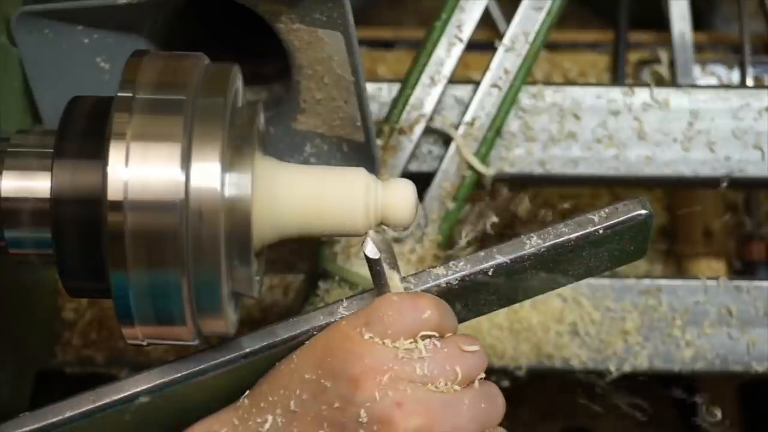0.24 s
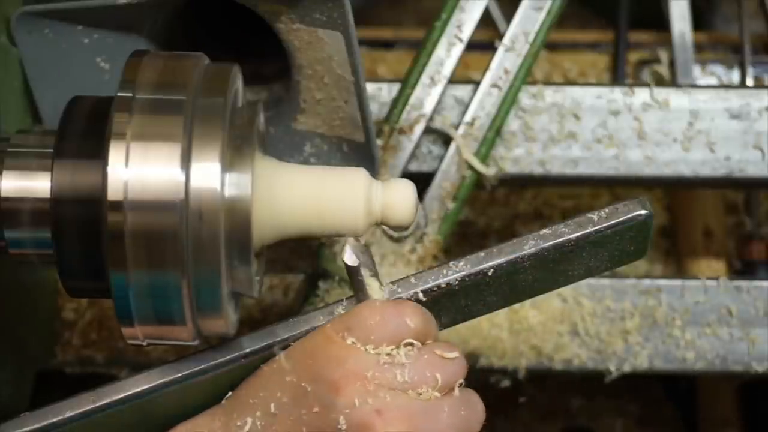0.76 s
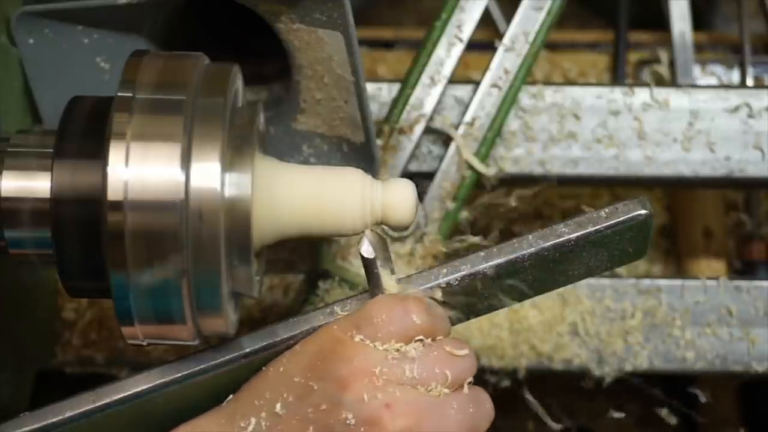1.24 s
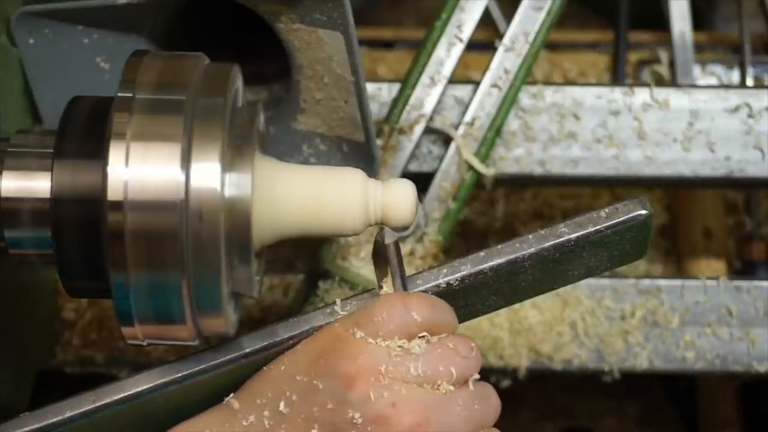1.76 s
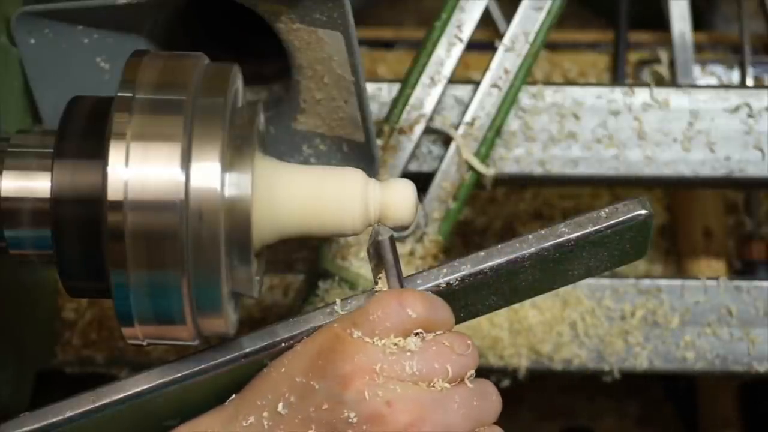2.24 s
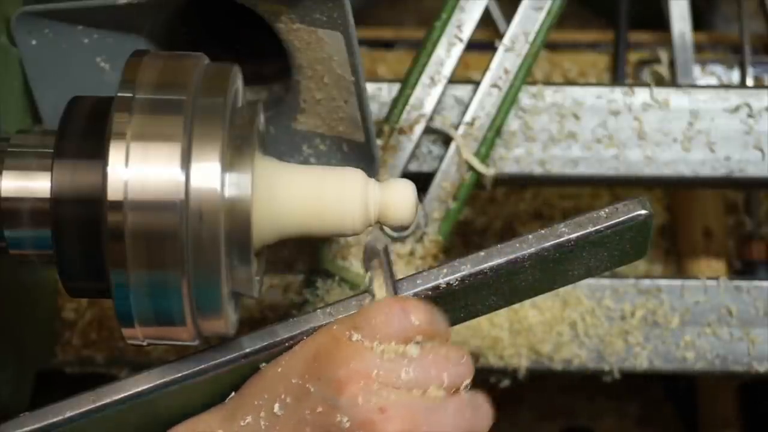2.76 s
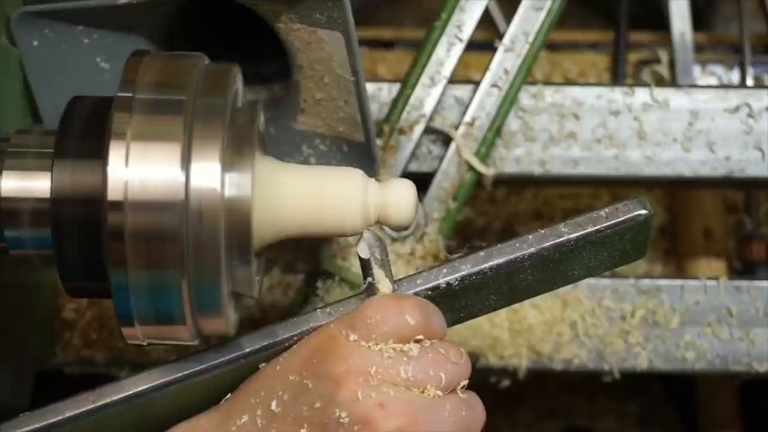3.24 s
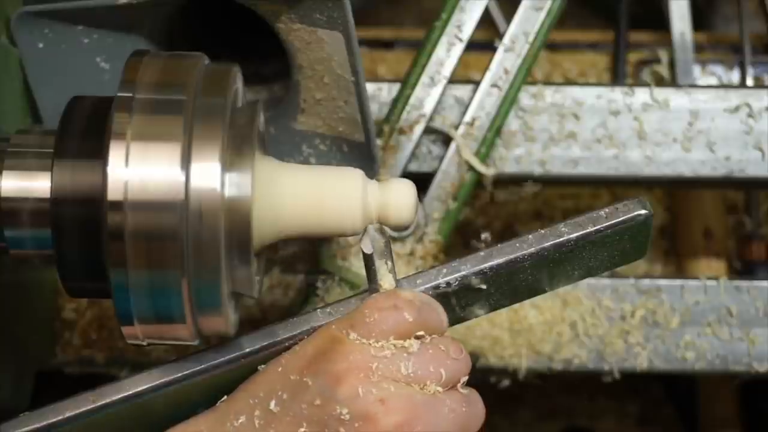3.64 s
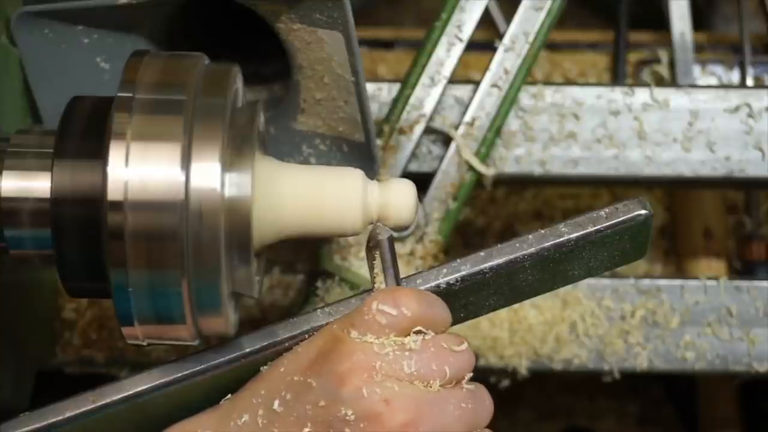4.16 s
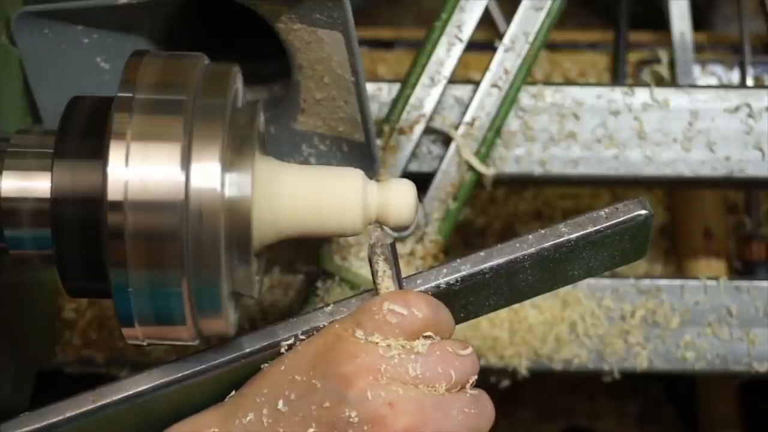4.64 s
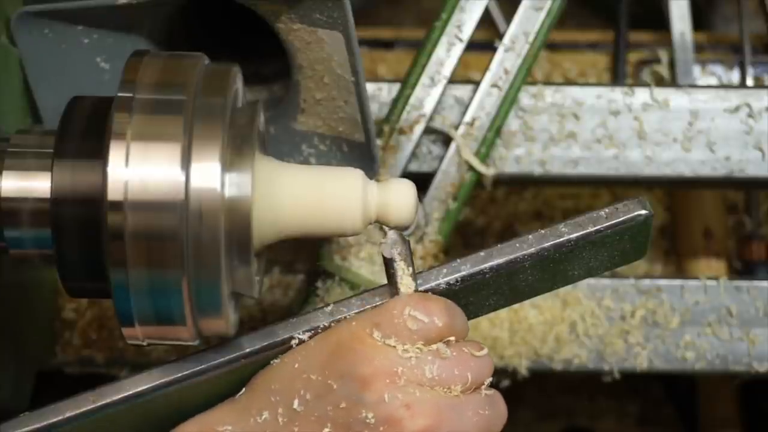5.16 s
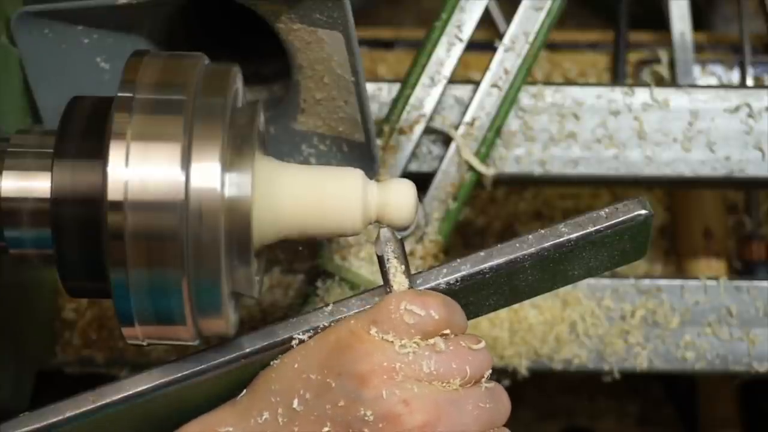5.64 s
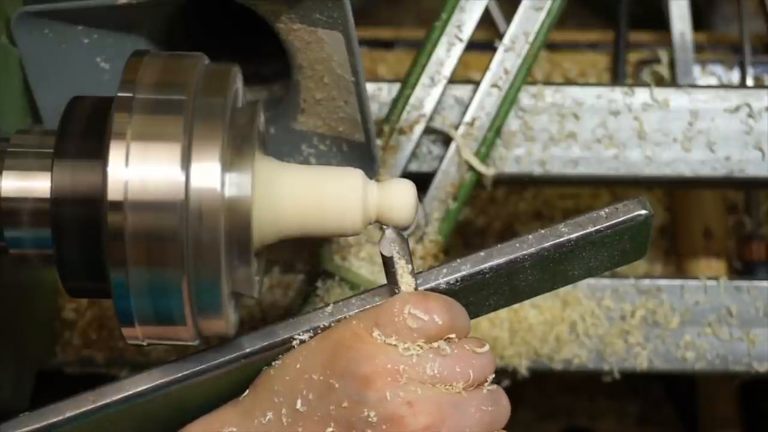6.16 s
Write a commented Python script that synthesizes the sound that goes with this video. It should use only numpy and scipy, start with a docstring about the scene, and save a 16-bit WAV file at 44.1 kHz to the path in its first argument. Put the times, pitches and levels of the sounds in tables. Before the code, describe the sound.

A lathe runs throughout, close up in a workshop, with rushing bearings and a wavering motor whine. Over it a chisel makes eight short scraping cuts on spinning wood, starting at once and again at about 0.7, 1.9, 3, 4.1, 4.9, 5.2 and 5.9 seconds. Each lasts under a second and has a bright ring of wood and steel. Light cuts buzz and throb; deeper ones hiss and tear off shavings, most strongly in the first second and a half. From half a second in, hard spots give small, sharp knocks against the edge. The tool rest groans softly near 1 and 3.5 seconds. Brief high squeals come near 2, 3, 4.2 and 5.4 seconds, and the blade chatters around 2 to 2.7 seconds and again near 4.4. The last cut carries on to about 6.4 seconds.

```python
"""Close up in a workshop, a lathe hums and whines while a chisel makes eight short cuts on a wooden spindle.
From the first, the scraping rings wood and steel. The same grain passes the edge every turn, so light cuts
buzz and throb; deep cuts tear up fresh wood and hiss. From half a second in, hard spots knock the edge.
Near 1 s the tool rest groans, near 2 s the tool squeals and the blade chatters; all three come back later.
Between cuts the bearings and motor run on."""
import sys
import numpy as np
from scipy import signal
from scipy.fft import rfft, irfft
from scipy.io import wavfile
from scipy.ndimage import uniform_filter1d, map_coordinates

SR = 44100
rng = np.random.default_rng(int(sys.argv[2]) if len(sys.argv) > 2 else 0)


def inscribe(sig):
    """Save sig as 16-bit PCM at rate SR to the path in sys.argv[1].

    A 1-D sig is mono; a 2-D sig holds one channel per row.
    Samples are clipped to [-1, 1] before scaling.
    """
    pcm = np.round(np.clip(np.atleast_2d(sig).T, -1, 1) * 32767)
    wavfile.write(sys.argv[1], SR, pcm.astype(np.int16))


N = 282636
TIME = np.arange(N) / SR
FREE_HZ = 42.42  # turns a second of the unloaded spindle

# The cuts: the bevel touches, then the edge bites, holds and lifts. Each row: bite time, lead of the touch,
# hold and release in seconds, touch and ring in relative dB, ring drift in dB/s, fizz in relative dB,
# fizz drift in dB/s, share (0-1) of the surface met again on the next turn.
CUTS = [(-0.03, 0.05, 0.62, 0.057, -40, -22, 6.5, -52.5, 3, 0.44),
        (0.724, 0.1, 0.79, 0.03, -34, -21, 3.5, -48.5, -12, 0.34),
        (1.898, 0.075, 0.71, 0.12, -27.5, -17, -3.5, -51, -1, 0.84),
        (2.999, 0.04, 0.7276, 0.057, -32, -24, 11, -52.5, 0, 0.65),
        (4.135, 0.069, 0.35, 0.09, -25, -19, 7, -50, -21, 0.66),
        (4.916, 0.098, 0.21, 0.12, -31.5, -23.5, -18, -36, -7, 0.42),
        (5.233, 0.013, 0.51, 0.2, -40, -20.5, -3.5, -39.5, -12.5, 0.48),
        (5.927, 0.051, 0.47, 0.092, -35.5, -22.5, 0.5, -42.5, 10.5, 0.71)]
# Resonances of chisel and tool rest. Each row: pitch in Hz, width in Hz, lift in dB.
STEEL = [(1170, 60, 5), (3190, 50, 6), (3620, 80, 2), (3850, 80, 3), (4830, 160, 4), (5420, 150, 6),
         (6130, 150, 6), (6980, 130, 3), (7720, 140, 6), (12600, 400, 4)]


def amp(db):
    """Decibels to gain."""
    return 10 ** (np.asarray(db) / 20)


def unit(x):
    """Scales to rms 1."""
    return x / np.sqrt(np.mean(x ** 2) + 1e-20)


def steady(x, size=2080):
    """Levels to rms 1 over size samples (about two turns by default), keeping the faster flutter."""
    power = uniform_filter1d(uniform_filter1d(x ** 2, size), size // 2)
    return x / np.sqrt(abs(power) + 1e-20)


def read(points, hz):
    """Reads a curve of points joined on a log-frequency axis."""
    f, value = np.transpose(points)
    return np.interp(np.log(hz + 1), np.log(f + 1), value)


def drift(rate_hz):
    """A smooth random wander of rms 1, with swings up to about rate_hz."""
    hz = np.fft.rfftfreq(N, 1 / SR)
    return unit(irfft(rfft(rng.standard_normal(N)) * np.exp(-(hz / rate_hz) ** 2), N))


def colour(x, spectrum, peaks=(), size=4096):
    """Minimum-phase EQ: a broad spectrum with resonances standing on it."""
    hz = np.fft.rfftfreq(size, 1 / SR)
    db = read(spectrum, hz) + sum(lift / (1 + (2 * (hz - f) / width) ** 2) for f, width, lift in peaks)
    cepstrum = irfft(np.log(amp(np.maximum(db, -100))))
    cepstrum[1:size // 2] *= 2
    cepstrum[size // 2 + 1:] = 0
    return signal.oaconvolve(x, irfft(np.exp(rfft(cepstrum))))[:N]


def resonate(x, hz, width_hz):
    """A steep resonance that may glide: shift hz down to zero, smooth twice, shift back."""
    carrier = np.exp(2j * np.pi * np.cumsum(hz * np.ones(len(x))) / SR)
    r = np.exp(-np.pi * width_hz / SR)
    return 2 * (carrier * signal.lfilter([(1 - r) ** 2], [1, -2 * r, r * r], x / carrier)).real


def envelope(start, rise, hold, release):
    """A smooth rise, a hold, and a fall of 40 dB in each release time."""
    age = TIME - start
    attack = np.sin(np.pi / 2 * np.clip(age / rise, 0, 1)) ** 2
    return attack * amp(-40 * np.maximum(age - rise - hold, 0) / release)


def swells(table):
    """Gain over time from rows of start, rise, hold, release and dB."""
    return sum(amp(db) * envelope(*shape) for *shape, db in table)


def blend(deep, light, depth):
    """Equal-power crossfade of two sounds by the depth of the cut."""
    return steady(np.sqrt(depth) * unit(deep) + np.sqrt(1 - depth) * unit(light))


def lathe(rush_db=-43.5, whine_db=-2, waver_hz=4.16, flutter=0.67):
    """Bearing noise rushes through the headstock, under the wavering whine of motor and belt."""
    # Colour of the bearing noise. Each row: frequency in Hz, relative level in dB.
    bearings = [(40, -34), (110, -51), (150, -15.5), (230, -11), (300, -2), (450, 1), (900, 4),
                (1300, -5.5), (1700, -7), (2400, -8.5), (3400, -6), (4500, -22.5), (7000, -29), (9200, -27),
                (10500, -45), (16000, -40)]
    # Headstock resonances. Each row: pitch in Hz, width in Hz, lift in dB.
    headstock = [(276, 9.2, 7.5), (455, 4.5, 7.5), (938, 22, 7.5), (1988, 450, 16), (3300, 69, -9.5),
                 (8260, 1100, 4.5)]
    # The rush comes up a little late on. Each row: time in seconds, lift in dB.
    rush_lift = [(4.6, -0.3), (5.1, 1.86)]
    # Tones of motor and belt. Each row: pitch in Hz, relative level in dB.
    tones = [(419.9, -58), (678.3, -62), (855.9, -58.5), (925.9, -59), (1184, -59.5), (1916, -51.5),
             (1960, -51), (2003, -48), (2229, -66), (2778, -64), (3176, -64), (3386, -70), (5803, -80),
             (8210, -72)]
    rush = unit(colour(rng.standard_normal(N), bearings, headstock))
    rush *= amp(rush_db + np.interp(TIME, *np.transpose(rush_lift)))
    whine = np.zeros(N)
    waver, swell = drift(25), drift(20)
    for hz, db in tones:
        shift = rng.integers(N)
        phase = 2 * np.pi * np.cumsum(hz + waver_hz * np.roll(waver, shift)) / SR
        whine += amp(db + whine_db) * np.sqrt(2) * np.sin(phase) * (1 + flutter * np.roll(swell, shift))
    return rush + whine


def strokes(bite_s=0.019, usual_db=-39, touch_fade_db_per_s=-75, touch_hiss_db=-35, touch_fizz_db=-12):
    """Gains of ring, shearing and fizz: each follows the bevel's touch, then the depth of the cut."""
    # Depth from bite to lift, one curve a cut. Each point: time in seconds, shearing in relative dB.
    depth_curves = [
        [(0.05, -32.5), (0.528, -37), (0.575, -45)],
        [(0.745, -42), (0.825, -34), (0.935, -33), (0.941, -31), (1.399, -37), (1.51, -55)],
        [(1.92, -42.5), (1.994, -46.5), (2.286, -39), (2.6, -38)],
        [(3.02, -45), (3.032, -54.5), (3.098, -41), (3.212, -44), (3.496, -37), (3.706, -40.5), (3.72, -50)],
        [(4.16, -38), (4.184, -38), (4.474, -45), (4.49, -49)],
        [(4.935, -68), (5.093, -49.5), (5.1, -69)],
        [(5.27, -42.5), (5.312, -42.5), (5.76, -53)],
        [(5.945, -51.5), (5.991, -54.5), (6.113, -44), (6.125, -54), (6.311, -40), (6.4, -42.5)],
    ]
    ring_follow, fizz_follow = 0.26, 0.65  # dB gained for each dB of depth
    ring, shear, fizz = np.zeros((3, N))
    for cut, curve in zip(CUTS, depth_curves):
        start, lead, hold, release, touch_db, ring_db, ring_drift, fizz_db, fizz_drift, _ = cut
        depth_db = np.interp(TIME, *np.transpose(curve))
        deeper_db = depth_db - usual_db
        age = np.clip(TIME - start, 0, hold)
        contact = envelope(start, bite_s, hold - bite_s, release)
        edge = envelope(start, bite_s, hold - bite_s, release * 0.82)  # hiss and fizz die before the ring
        fade_db = touch_fade_db_per_s * np.maximum(TIME - start + lead, 0)
        bevel = envelope(start - lead, rise=0.022, hold=lead, release=0.089) * amp(touch_db + fade_db)
        ring += bevel + contact * amp(ring_db + ring_follow * deeper_db + ring_drift * age)
        shear += bevel * amp(touch_hiss_db) + edge * amp(depth_db)
        fizz += bevel * amp(touch_fizz_db + fizz_db - ring_db)
        fizz += edge * amp(fizz_db + fizz_follow * deeper_db + fizz_drift * age)
    return ring, shear, fizz


def surface(turns, kept, size=1024):
    """The edge reads random relief round the wood; each turn cuts part away and bares new relief."""
    count = int(turns[-1]) + 2
    keep = np.clip(np.interp(np.arange(count), turns, kept * np.ones(N)), 0, .98)
    relief = rng.standard_normal((count, size))
    for k in range(1, count):
        relief[k] = keep[k] * relief[k - 1] + np.sqrt(1 - keep[k] ** 2) * relief[k]
    return map_coordinates(relief.ravel(), [turns * size], order=3, mode="nearest")


def bite(turns, depth, light_db=4.5, deep_db=1.5, runout=0.56, end_grain=0.1):
    """Grip of the edge: hard and soft patches, a high side, end grain twice a turn; steadier when deep."""
    patches = unit(surface(turns, 0.94, size=10) + 0.11 * surface(turns, 0.27, size=40))
    throb = runout * np.cos(2 * np.pi * turns) + end_grain * np.cos(4 * np.pi * turns)
    return amp((light_db + depth * (deep_db - light_db)) * (patches + throb))


def splinters(turns, spread_db=7.5, decay_s=0.0032):
    """Fibres snap at uneven sizes; each snap starts at once and dies within milliseconds."""
    sizes = amp(spread_db * surface(turns, 0.31, size=120))
    return unit(signal.lfilter([1], [1, -np.exp(-1 / (decay_s * SR))], sizes))


def roll(x, patchy_db):
    """The contact point wanders along the edge, so narrow bands swell and fade."""
    bands = signal.stft(x, nperseg=1024)[2]
    patches = rng.standard_normal(bands.shape)
    for _ in range(2):
        patches = uniform_filter1d(uniform_filter1d(patches, size=5, axis=0), size=18, axis=1)
    return signal.istft(bands * amp(patchy_db * unit(patches)), nperseg=1024)[1][:N]


def wood_ring(scrape, skim, depth):
    """Scraping rings the workpiece; a pressed-in edge lowers and widens the ring."""
    # The ring in a deep cut and in a light skim. Each row: frequency in Hz, relative level in dB.
    deep_colour = [(1000, -77), (1700, -51), (1780, -52), (1890, -19.5), (2220, -6), (2280, 4), (2400, 10),
                   (3000, -22), (3200, -17.5), (4160, -78), (7040, -120)]
    light_colour = [(300, -62), (1600, -43), (2100, -33), (2280, -16), (2370, -2.5), (2490, 1),
                    (2620, -10.5), (2850, -15), (3100, -44.5), (4200, -47.5)]
    return blend(colour(scrape, deep_colour), colour(skim, light_colour), depth)


def shear_hiss(scrape, skim, depth):
    """Shearing fibres hiss through the steel; a pressed-in edge darkens the hiss."""
    # The hiss in a deep cut and in a light skim. Each row: frequency in Hz, relative level in dB.
    deep_colour = [(100, -60), (1000, -32), (1800, -20), (2700, 4.5), (3300, -4), (3800, 2.5), (4300, -2.5),
                   (4600, -8.5), (5700, -11), (6300, -9), (7600, -11), (8200, -19.5), (8800, -27),
                   (12700, -27), (13500, -45), (15400, -42), (16000, -72)]
    light_colour = [(100, -66), (1800, 1), (2750, 16), (3300, -40), (3800, 6), (4450, -24), (5000, 3.5),
                    (5700, -7), (6300, 7.5), (6700, -28), (7500, 6.5), (8000, -55), (8800, -36),
                    (16000, -56)]
    deep = roll(colour(scrape, deep_colour, STEEL), patchy_db=2.5)
    light = roll(colour(skim, light_colour, STEEL), patchy_db=3.5)
    return blend(deep, light, depth)


def shavings(scrape, shear, thin_db=-10):
    """A thin shaving tears away all through a cut; now and then a thick one peels off."""
    # Thick shavings. Each row: start, rise, hold and release in seconds, relative level in dB.
    peels = [(-0.03, 0.08, 0.5, 0.091, -37.5), (0.36, 0.025, 0.035, 0.053, -44.5),
             (0.79, 0.024, 0.016, 0.055, -62), (0.9, 0.095, 0.2, 0.42, -35.5),
             (1.03, 0.013, 0.037, 0.096, -40), (1.29, 0.041, 0.033, 0.065, -45.5),
             (3.45, 0.072, 0.074, 0.27, -38), (4.18, 0.29, 0.018, 0.11, -42)]
    # Colour of tearing wood. Each row: frequency in Hz, relative level in dB.
    tear_colour = [(120, -73.5), (330, -11), (600, -46.5), (950, -14), (1170, 2.5), (1400, -6), (1600, 3.5),
                   (1780, 7), (1980, 14.5), (2200, 17), (2700, -1.5), (3500, 5), (9000, -44), (14000, -47)]
    return (swells(peels) + amp(thin_db) * shear) * steady(colour(scrape, tear_colour, STEEL))


def fibre_fizz(snapping, grip, turns, depth, throb_db=1.0):
    """Fine fibres fizz along the whole edge, which meets partly other patches of the wood."""
    # Colour of the fizz. Each row: frequency in Hz, relative level in dB.
    fizz_colour = [(300, -88), (6000, -45), (8700, -17), (9100, 3), (9450, 11), (9750, 6), (10300, 6),
                   (10900, 4.5), (11400, -10), (12600, -8), (13500, -18), (14300, -12), (15400, -19),
                   (16000, -43)]
    edge_grip = np.sqrt(grip * bite(turns, depth)) * amp(throb_db * np.cos(2 * np.pi * turns))
    return steady(roll(colour(edge_grip * snapping, fizz_colour), patchy_db=6.0))


def knocks():
    """Time and level of each knock: a hard spot meets the edge once a turn until it is cut away."""
    # Hard spots. Each row: first knock in seconds, relative peak in dB, number of turns.
    hard_spots = [(0.46, -5.5, 2), (0.672, -11, 1), (0.733, -18, 1), (0.909, -10, 1), (1.43, -8.5, 1),
                  (1.934, -11, 3), (2.054, -10, 2), (3.011, -14.5, 1), (3.256, -14, 2), (3.4, -8, 1),
                  (3.527, -5, 3), (4.251, -12, 1), (4.826, -20, 1), (4.921, -20, 1), (4.991, -17, 2),
                  (5.086, -15.5, 2), (5.242, -15, 1), (5.275, -11, 2), (5.395, -11, 1), (5.426, -11, 2),
                  (5.473, -9, 2), (6.088, -11, 1), (6.157, -19, 1), (6.242, -13, 1), (6.276, -8.5, 6)]
    return [(s + turn / FREE_HZ, db) for s, db, count in hard_spots for turn in range(round(count))]


def catches(ring_db=-6, ring_hz=2433.0, width_hz=101.0, hiss_db=-35, catch_s=0.011):
    """A hard spot knocks the edge: one short chirp of the workpiece, with a little hiss."""
    # Colour of that hiss. Each row: frequency in Hz, relative level in dB.
    hiss_colour = [(200, -75), (2000, -28), (3000, -37), (4500, -1), (7300, 5), (8500, -14), (12000, -17),
                   (14000, -49)]
    force = np.zeros(N)
    for s, db in knocks():
        # the force swells smoothly and lets go more slowly
        arc = np.interp((TIME - s) / catch_s, [-1 / 6, 1 / 3, 7 / 6], [0, np.pi / 2, np.pi])
        force += amp(db) * np.sin(arc) ** 2
    noise = rng.standard_normal(N)
    ring = steady(resonate(noise, ring_hz, width_hz), size=400)
    hiss = steady(colour(noise, hiss_colour, STEEL))
    return force * (amp(ring_db) * ring + amp(hiss_db) * hiss)


def riding(duck_db=-1.5):
    """A hard spot holds the edge off the softer wood for the turn around it."""
    held = np.zeros(N)
    for s, _ in knocks():
        held[abs(TIME - s) < .55 / FREE_HZ] = 1
    return amp(duck_db * uniform_filter1d(held, size=200))


def groan(scrape):
    """The tool rest groans under a heavy push."""
    # Pushes. Each row: start, rise, hold and release in seconds, level in dB.
    pushes = [(0.95, 0.15, 0.05, 0.3, -49.5), (3.5, 0.08, 0.11, 0.18, -49)]
    # Colour of the groan. Each row: frequency in Hz, relative level in dB.
    groan_colour = [(120, -56), (250, -19), (350, 6), (430, -4), (700, -25), (2000, -68)]
    return swells(pushes) * unit(colour(scrape, groan_colour))


def squeals(scrape, width_hz=110):
    """Stick and slip sings briefly as the tool rolls: gliding tones fed by the scraping."""
    # Squeals. Each row: start and end in seconds, first and last pitch in Hz, level in dB.
    glides = [(1.82, 2.007, 2740, 2930, -33), (2.984, 3.21, 2820, 2720, -36),
              (3.08, 3.129, 4970, 4530, -47), (3.03, 3.607, 3774, 3640, -39.5),
              (4.099, 4.394, 2800, 2700, -31.5), (5.282, 5.494, 3230, 3460, -43),
              (5.55, 5.753, 3380, 3565, -51)]
    out = np.zeros(N)
    for start, end, first_hz, last_hz, db in glides:
        span = slice(int(start * SR), int(end * SR))
        size = len(out[span])
        tone = unit(resonate(scrape[span], np.linspace(first_hz, last_hz, size), width_hz))
        out[span] += amp(db) * tone * signal.windows.tukey(size, .5)
    return out


def chatter(turns, pulse_db=5.0, gain_db=-7.0):
    """The blade is kicked into ringing once a turn."""
    # Bouts of chatter. Each row: start, rise, hold and release in seconds, relative level in dB.
    bouts = [(1.85, 0.54, 0.29, 0.11, -34), (4.08, 0.26, 0.11, 0.17, -37)]
    # Blade modes. Each row: pitch in Hz, width in Hz, relative level in dB.
    modes = [(3838, 170, 11.5), (4190, 250, 3), (7000, 220, -27), (15300, 600, -25)]
    kicks = surface(turns, 0.81) * amp(-pulse_db * np.cos(2 * np.pi * turns))
    ringing = sum(amp(db) * steady(resonate(kicks, hz, width)) for hz, width, db in modes)
    return amp(gain_db) * swells(bouts) * ringing


def cutting(ring_db=-1.88, shear_db=6.5, tear_db=13.0, fizz_db=-1.0, sag_hz=0.42, full_load_db=-33):
    """Fibres snapping at the edge drive workpiece, steel and shaving; the load slows the spindle."""
    ring, shear, fizz = strokes()
    turns = np.cumsum(FREE_HZ - sag_hz * shear / amp(full_load_db)) / SR
    starts, *_, shares = np.transpose(CUTS)
    kept = shares[np.searchsorted(starts[1:], TIME)]
    depth = np.tanh(shear / amp(-44.5))  # 0 for a skim, 1 for a deep cut
    grip = bite(turns, depth)
    scrape = grip * surface(turns, 0.77 * kept)
    skim = grip * surface(turns, 0.97 * kept)  # more grain repeats, so it buzzes
    snap = splinters(turns)
    even_skim = skim / grip ** 0.84  # most of the throb taken out
    wood = amp(ring_db) * ring * riding() * wood_ring(scrape, skim, depth)
    hiss = amp(shear_db) * shear * shear_hiss(scrape * snap, even_skim * snap, depth)
    tearing = amp(tear_db) * shavings(grip * surface(turns, kept), shear)
    fibres = amp(fizz_db) * fizz * fibre_fizz(snap * surface(turns, kept), grip, turns, depth)
    cut = wood + hiss + tearing + fibres
    return cut + groan(scrape) + depth * chatter(turns) + squeals(grip * surface(turns, kept))


def workshop(x):
    """The room answers with a short diffuse tail whose top end dies first."""
    # Room decay. Each row: frequency in Hz, seconds to fall 60 dB.
    decays = [(250, 0.066), (2500, 0.053), (6000, 0.071), (14000, 0.019)]
    hz, t, bands = signal.stft(rng.standard_normal(SR // 2), SR, nperseg=256)
    tail = signal.istft(bands * amp(-60 * t / read(decays, hz)[:, None]), SR, nperseg=256)[1]
    tail[:SR // 250] = 0  # 4 ms pre-delay
    return signal.oaconvolve(x, tail / np.linalg.norm(tail))[:N]


def scene():
    """The cuts, their room sound and the running lathe, in mono."""
    tool = cutting() + catches()
    return (tool + amp(-13.5) * workshop(tool) + lathe())[None]


def record(dry, low_cut_hz=160.0, high_cut_hz=15850):
    """A gentle low cut and a steep high cut on the mix."""
    thin = signal.sosfilt(signal.butter(2, low_cut_hz, "highpass", fs=SR, output="sos"), dry)
    high_cut = signal.firwin(511, high_cut_hz, window=("kaiser", 9), fs=SR)
    return signal.oaconvolve(thin, high_cut[None], "same")


dry = scene()
out = record(dry)
inscribe(out)
```